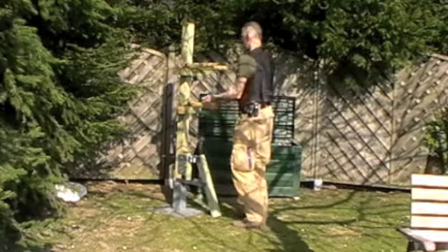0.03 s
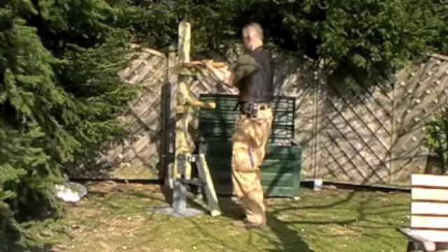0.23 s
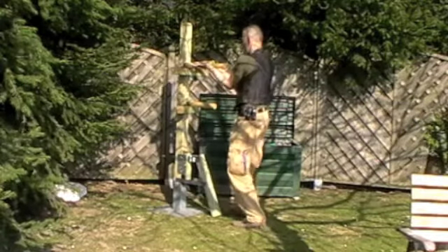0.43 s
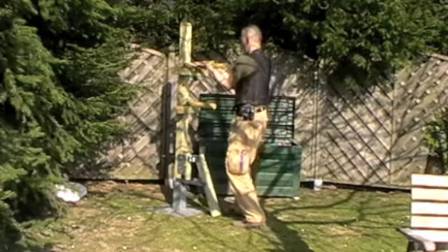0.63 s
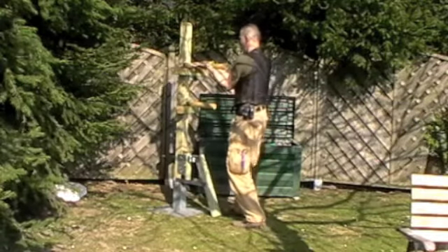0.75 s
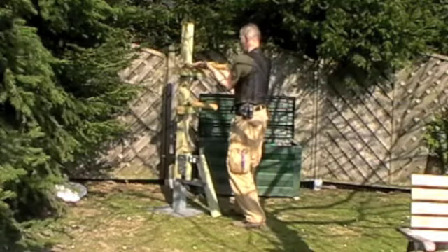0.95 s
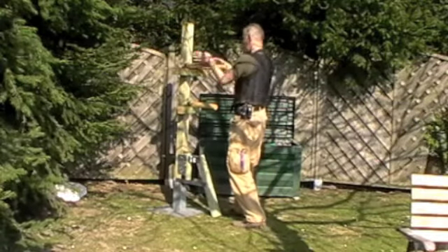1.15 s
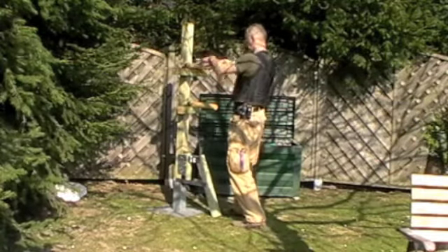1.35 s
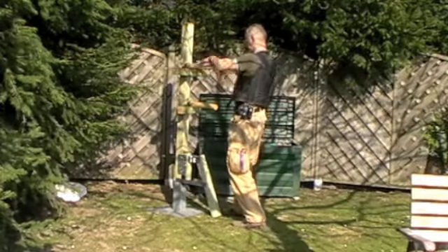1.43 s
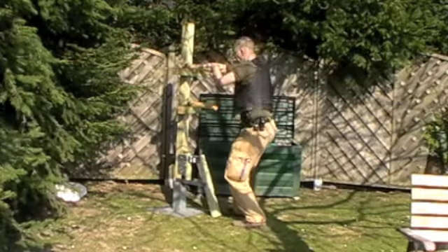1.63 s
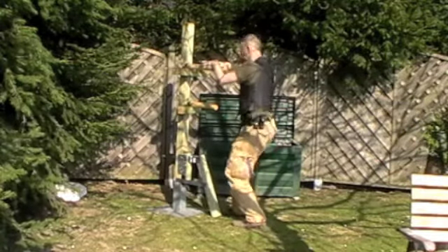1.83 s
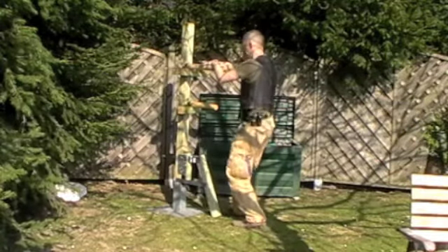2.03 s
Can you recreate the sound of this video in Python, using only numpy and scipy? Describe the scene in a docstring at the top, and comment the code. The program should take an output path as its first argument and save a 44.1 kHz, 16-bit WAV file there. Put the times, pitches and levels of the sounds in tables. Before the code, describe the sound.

Hard wood-on-wood knocks come in a rapid cluster early on, with loose pegs clacking and sleeves brushing, then near quiet and a much softer, stand-shaking knock. Faint outdoor wash, distant drone and small bird, short garden echo.

```python
"""Forearms on a wooden training dummy

In a small fenced garden, blows make a sharp crack, a clatter of loose pegs and a heavy trunk thud,
then later a soft knock that shakes the stand. Wood rattles are bursts of noise; trunk, stand and
pegs ring as dying sines; crack and ticks are short pulses. Sleeves brush by as grainy hiss. A small
bird whistles in gliding notes over a far drone and a low outdoor wash, both made of shaped noise."""
import sys
import numpy as np
from scipy import signal
from scipy.fft import rfft, irfft
from scipy.io import wavfile

SR = 44100
rng = np.random.default_rng(int(sys.argv[2]) if len(sys.argv) > 2 else 0)


def persist_wave(psi):
    """Save psi, clipped to +-1, as 16-bit WAV."""
    counts = np.round(np.clip(psi, -1, 1) * 32767).astype(np.int16)
    wavfile.write(sys.argv[1], SR, np.atleast_2d(counts).T)


N = 92610
T = np.arange(N) / SR  # time of each sample, s
HZ = np.fft.rfftfreq(N, 1 / SR)  # frequency of each spectrum bin

# In all tables t60 is the time to die away by 60 dB.

# Outdoor wash, shape only (frequency [Hz], relative level [dB])
WASH = [(15, -48), (24, -33), (32, -21), (43, -9), (54, -3), (68, 0), (90, -5), (120, -1), (170, -3),
        (220, -9), (280, -7), (400, -11), (540, -14), (760, -16), (1050, -14), (1600, -19), (2000, -24),
        (2600, -28), (4200, -37), (7000, -40), (10500, -48), (16000, -56)]
# How alike the wash is in left and right (frequency [Hz], likeness [0-1])
LIKENESS = [(60, 1), (400, 0.91), (1200, 0.75), (3000, 0.48), (8000, 0.42), (14000, .4)]
# Resonances of the far drone (frequency [Hz], width [Hz], relative level [dB])
DRONE = [(266, 49, -9), (320.6, 46.5, 1), (618, 22.6, -9), (1045, 113, -17)]
# Swelling of the drone (time [s], level [dB])
DRONE_LEVEL = [(0, -45), (0.55, -62), (0.85, -49), (1.05, -48), (1.23, -43.5), (1.3, -53.5), (1.45, -47.5),
               (1.7, -52), (1.95, -48), (2.1, -59)]
# Bird notes (start [s], length [s], start pitch [Hz], middle pitch [Hz], end pitch [Hz], level [dB])
BIRD = [(0.477, 0.059, 3700, 4294, 4540, -53), (0.535, 0.042, 2750, 3304, 3740, -51.5),
        (0.569, 0.027, 2950, 2717, 2400, -51), (1.117, .052, 4300, 4380, 4370, -54),
        (1.153, 0.0225, 3900, 3120, 2600, -59), (1.177, 0.028, 3050, 3366, 3650, -48.5),
        (1.196, 0.029, 3150, 2770, 2590, -50.5), (1.227, 0.012, 2600, 2410, 2450, -52.5),
        (1.333, 0.048, 2650, 2550, 2480, -64), (1.461, 0.047, 2700, 2920, 3030, -72),
        (1.527, 0.031, 2780, 2690, 2660, -61), (1.786, 0.046, 4600, 4500, 4600, -64.5),
        (1.815, .05, 3890, 3700, 3610, -63)]
# Sleeves and skin brushing the wood
# (loudest moment [s], rise [s], fall [s], level [dB], centre frequency [Hz])
BRUSHES = [(0.045, 0.06, 0.044, -57.5, 5940), (0.205, 0.052, .02, -54.5, 5500),
           (0.313, 0.06, 0.032, -43.5, 7400), (0.450, 0.033, 0.0093, -50, 8000),
           (0.68, 0.11, .05, -65, 6300), (1.07, 0.1, 0.13, -61, 6100), (1.22, 0.12, 0.058, -59, 7000),
           (1.671, 0.085, 0.079, -59, 5560), (1.85, 0.029, 0.035, -63, 5340),
           (1.923, 0.011, 0.047, -58, 5800), (2.09, 0.02, .05, -64.5, 5030)]
# Light clicks of loose parts (time [s], level [dB], centre frequency [Hz], width [Hz])
TICKS = [(0.2088, -14.5, 5900, 1090), (0.2141, -12.5, 5800, 1500), (0.2142, -16, 1610, 900),
         (0.2166, -24, 5560, 2000), (0.2426, -37, 7900, 1000), (0.3465, -27.5, 8150, 1090),
         (0.4452, -25.5, 7440, 910), (0.4532, -30, 8400, 600), (1.6400, -51, 8000, 900),
         (1.6628, -41, 9000, 3000), (1.6664, -38.5, 4830, 700), (1.7180, -37.5, 4100, 400),
         (1.7190, -39, 6130, 500)]
# Ringing notes of two loose pegs (frequency [Hz], relative level [dB], t60 [s])
UPPER_PEG = [(796, -13, .08), (1041, -10, .09), (1270, -13, .08), (1717, -10, .08), (1981, -11, .08),
             (2209, -8, .07), (2425, -6, .09), (2587, 0, .075), (2640, -9, .05), (2869, -12, .07),
             (3281, -12, .08), (5194, -11, .1), (5512, -13, .1)]
LOWER_PEG = [(1733, -4, .08), (1951, -4, .08), (2263, -3, .08), (2417, 0, .11), (2578, -7, .11),
             (3451, -8, .08)]
# Notes of a peg tapped lightly on its end (frequency [Hz], relative level [dB], t60 [s])
PEG_TIP = [(2430, -3, .07), (2510, -3, .07), (2780, 0, .06), (2850, -2, .05)]
# Pegs jolted in their slots (time [s], which ringing notes [table above], level [dB])
PEG_HITS = [(0.2193, UPPER_PEG, -30), (0.2680, UPPER_PEG, -22), (0.346, PEG_TIP, -37),
            (0.4131, LOWER_PEG, -31.5), (0.4423, LOWER_PEG, -41.5)]
# Hollow notes of a peg's slot (frequency [Hz], relative level [dB], t60 [s])
SLOT = [(606, 0, .13), (622, -6, .12)]
# Moments when the slot answers (time [s], level [dB])
HOLLOW = [(0.2305, -26.5), (0.4400, -36)]
# Spectrum of the hard slap of wood on wood (frequency [Hz], relative level [dB])
CRACK = [(30, -35), (150, -7), (800, -2), (2200, 0), (6000, 0), (8500, -6), (11000, -22), (16000, -31)]
# Blows (start [s], rise [s], t60 [s], then the wood rattle before its roll-off: low [dB], body [dB],
# middle [dB], high [dB], and finally trunk ring [dB], stand ring [dB])
KNOCKS = [(0.2075, 0.0018, 0.077, -20, -29, -22, -26, -48, -70),
          (0.2176, 0.0011, 0.15, -23, -22, -23.5, -19, -46, -46),
          (0.2680, 0.0055, 0.11, -19.5, -26.5, -20, -23.5, -33, -65),
          (0.344, .0005, 0.03, -46, -60, -31, -40, -43, -75),
          (0.41, 0.00033, 0.046, -24, -18, -27, -31.5, -19, -55),
          (0.4164, 0.00088, 0.24, -24.5, -33, -31.5, -36.5, -27.5, -78),
          (1.6387, 0.00087, 0.23, -49, -36, -37, -44, -55, -31),
          (1.7160, .0025, 0.093, -45, -43, -38.5, -44, -65, -56)]
# Where those four rattle levels sit (low [Hz], body [Hz], middle [Hz], high [Hz])
WOOD_HZ = (150, 600, 2200, 6000)
# Roll-off of the wood noise (frequency [Hz], gain [dB])
WOOD_EDGES = [(30, -44), (85, 5.5), (160, 9), (6500, -1.5), (8800, -5), (10500, -14.5), (13000, -26),
              (16000, -26)]
# Ringing notes of the trunk and of the stand (frequency [Hz], relative level [dB], t60 [s])
TRUNK = [(137, -2, .085), (223, -11, .07), (290, -4, .055), (325, 1, .065), (380, -7, .03), (473, -5, .065),
         (520, -7, .055), (648, -14, .13), (802, -18, .06)]
STAND = [(172, -11, .14), (255, 0, .22), (602, -16, .12), (995, -12, .12), (1133, -12, .1)]
# Echo of fence and hedge (frequency [Hz], t60 [s])
GARDEN = [(100, 0.1), (500, 0.36), (2500, 0.2), (7000, 0.21), (14000, 0.48)]
# Balance of the dummy (frequency [Hz], left minus right [dB])
LEFT_LEAD = [(250, 0), (600, 0), (1400, 2), (2800, 1.3), (4500, 0), (14000, -.5)]

WASH_DB = -46
BIRD_WAVER, BIRD_FLUTTER_DB = 0.04, 3  # random pitch change as a fraction, random loudness change
BIRD_WET_DB, BIRD_T60_S = -2.5, 0.38
GRAINS_PER_S, GRAIN_SPREAD_DB = 2500, 5.5  # slips of cloth: how many, how uneven in size
SMOOTH_DB = 1.5  # hiss compared with the slips
BRUSH_OCTAVES = 1  # spread of the brushing band
TICK_TAIL_DB, TICK_T60_S = -18, 0.014  # rattle compared with its click
PEG_RISE_S, SLOT_RISE_S = 0.003, 0.0082
TRUNK_RISE_S, STAND_RISE_S = 0.0012, 0.0044
CRACK_S, CRACK_DB = 0.21145, -1.5
WOOD_GRAIN_DB, GRAIN_S = 1.5, 0.0005  # random roughness of the rattle and its time span
WOOD_WIDTH = 0.064  # stereo width: 0 is the same noise on both sides
RADIATES_ABOVE_HZ = 100  # the slim post moves little air below this
GARDEN_DB, GARDEN_DELAY_S, GARDEN_WIDTH = -13.5, 0.014, 0.14
MONO_BELOW_HZ = 390  # stereo noise narrows towards the bass from here
LOW_CUT_HZ, EDGE_HZ = 45, 16000


def amp(db):
    """Turns decibels into a gain."""
    return 10 ** (np.asarray(db) / 20)


def unit(x):
    """Scales a sound to an average strength (rms) of 1."""
    return x / np.sqrt(np.mean(x ** 2) + 1e-20)


def read(points, hz):
    """Reads a table between its points, on a log-frequency axis as in hearing."""
    f, value = np.transpose(points)
    return np.interp(np.log(hz + 1), np.log(f + 1), value)


def colour(x, gain):
    """Applies a gain for each frequency."""
    return irfft(rfft(x) * gain, N)


def highpass(x, cut_hz):
    """Weakens what lies below cut_hz."""
    return signal.sosfilt(signal.butter(2, cut_hz, "highpass", fs=SR, output="sos"), x)


def slow(span_s):
    """Makes a smooth random wander of rms 1 that changes within about span_s."""
    return unit(colour(rng.standard_normal(N), np.exp(-(HZ * span_s) ** 2)))


def pair(width):
    """Makes left and right noise, alike in the bass; a small width keeps the rest nearly alike."""
    mid, side = rng.standard_normal((2, N))
    side = width * colour(side, HZ / np.hypot(HZ, MONO_BELOW_HZ))
    return unit(np.array([mid + side, mid - side]))


def struck(start, rise, t60):
    """Loudness of a struck thing: a quick rise and an exponential fall."""
    age = np.maximum(T - start, 0)
    fall = np.exp(-np.log(1000) * age / t60)
    return np.minimum(age / max(rise, 1e-5), 1) * fall


def ring(modes, start, rise):
    """A struck part vibrates at its own notes, each a sine dying at its own speed."""
    total = np.zeros(N)
    for hz, db, t60 in modes:
        total += amp(db) * struck(start, rise, t60) * np.sin(2 * np.pi * hz * (start - T))
    return total


def echo(x, t60s, delay, width):
    """Scattered reflections: a noise tail in which each band dies at its own speed."""
    hz, t, bands = signal.stft(pair(width)[:, :SR], SR, nperseg=256)
    fall = np.exp(-np.log(1000) * t / read(t60s, hz)[:, None])
    tail = signal.istft(bands * fall, SR, nperseg=256)[1]
    # Silent until the delay, then fading in over the same time again
    tail = tail * np.clip(np.arange(tail.shape[1]) / SR / delay - 1, 0, 1)
    return signal.fftconvolve(x[None], tail / np.linalg.norm(tail[0]), axes=1)[:, :N]


def outdoors():
    """Low wash of far traffic and air, with a fuzzy drone of resonant noise that swells."""
    a, b = rng.standard_normal((2, N))
    same = np.clip(read(LIKENESS, HZ), 0, 1)
    right = colour(a, same) + colour(b, np.sqrt(1 - same ** 2))
    wash = unit(colour(np.array([a, right]), amp(read(WASH, HZ))))
    wash_level = amp(WASH_DB + 0.61 * slow(span_s=0.11))

    peaks = sum(amp(db) / (1 + (2 * (HZ - hz) / width) ** 4) for hz, width, db in DRONE)
    drone = unit(colour(pair(width=0.091), peaks))
    drone_level = amp(np.interp(T, *np.transpose(DRONE_LEVEL)))
    return wash_level * wash + drone_level * drone


def bird():
    """Whistles whose pitch glides and wavers while the loudness flutters, blurred by the trees."""
    song = np.zeros(N)
    waver = 1 + BIRD_WAVER * slow(span_s=0.00305)
    flutter = amp(BIRD_FLUTTER_DB * slow(span_s=0.012))
    for start, length, first, middle, last, db in BIRD:
        progress = np.clip((T - start) / length, 0, 1)
        hz = np.interp(progress, [0, 0.5, 1], [first, middle, last]) * waver
        swell = np.sqrt(abs(np.sin(np.pi * progress)))
        # Adding up the pitch sample by sample gives the phase of a gliding note
        whistle = np.sin(2 * np.pi * np.cumsum(hz) / SR)
        song += amp(db) * flutter * swell * whistle
    blur = echo(song, [(3000, BIRD_T60_S)], delay=0.0028, width=0.42)
    return song + amp(BIRD_WET_DB) * blur


def brushes():
    """Tiny slips of cloth and skin over a smooth hiss, swelling and fading with each stroke."""
    out = np.zeros((2, N))
    for peak, rise, fall, db, hz in BRUSHES:
        octaves_away = np.log2((HZ + 1) / hz)
        band = np.exp(-0.5 * (octaves_away / BRUSH_OCTAVES) ** 2) * amp(read(WOOD_EDGES, HZ))
        happens = rng.random(N) < GRAINS_PER_S / SR
        size = amp(GRAIN_SPREAD_DB * np.minimum(rng.exponential(1, N), 4))
        slips = happens * rng.choice([-1, 1], N) * size
        rustle = unit(colour(unit(slips) + amp(SMOOTH_DB) * pair(width=0.13), band))
        stroke = np.exp(-0.5 * ((T - peak) / np.where(T < peak, rise, fall)) ** 2)
        out += amp(db) * rustle * stroke
    return out


def ticks():
    """Loose parts click for a few cycles, each with a short noisy rattle in the same band."""
    out = np.zeros((2, N))
    for start, db, hz, width in TICKS:
        age = T - start
        click = np.exp(-2 * (np.pi * width * age) ** 2) * np.cos(2 * np.pi * hz * age)
        rattle = unit(colour(pair(WOOD_WIDTH), np.exp(-0.5 * ((HZ - hz) / width) ** 2)))
        tail = amp(TICK_TAIL_DB) * rattle * struck(start, GRAIN_S, TICK_T60_S)
        out += amp(db) * (click + tail)
    return out


def pegs():
    """Loose pegs clack with their own ringing notes; a slot answers with a hollow tone."""
    clacks = sum(amp(db) * ring(modes, start, PEG_RISE_S) for start, modes, db in PEG_HITS)
    hollow = sum(amp(db) * ring(SLOT, start, SLOT_RISE_S) for start, db in HOLLOW)
    return clacks + hollow


def crack():
    """One very short pressure pulse as a peg slams against its slot."""
    at_its_time = np.exp(-2j * np.pi * HZ * CRACK_S)  # lines up all frequencies at one moment
    pulse = irfft(amp(read(CRACK, HZ)) * at_its_time, N)
    return -amp(CRACK_DB) * pulse / abs(pulse).max()


def knocks():
    """Each blow rattles the wood as noise and rings trunk and stand by different amounts."""
    out = np.zeros((2, N))
    for start, rise, t60, low, body, middle, high, trunk_db, stand_db in KNOCKS:
        levels = list(zip(WOOD_HZ, (low, body, middle, high)))
        shape = amp(read(levels, HZ) + read(WOOD_EDGES, HZ))
        rattle = unit(pair(WOOD_WIDTH) * amp(WOOD_GRAIN_DB * slow(GRAIN_S)))
        out += colour(rattle, shape) * struck(start, rise, t60)
        out += amp(trunk_db) * ring(TRUNK, start, TRUNK_RISE_S)
        out += amp(stand_db) * ring(STAND, start, STAND_RISE_S)
    return out


def scene():
    """The dummy and its garden echo, with a left-right balance by frequency, over the background."""
    background = outdoors() + bird() + brushes()
    dummy = ticks() + pegs() + crack() + highpass(knocks(), RADIATES_ABOVE_HZ)
    dummy = dummy + amp(GARDEN_DB) * echo(dummy.mean(0), GARDEN, GARDEN_DELAY_S, GARDEN_WIDTH)
    half_lead = read(LEFT_LEAD, HZ) / 2
    return background + colour(dummy, amp(np.array([half_lead, -half_lead])))


def record(dry):
    """The microphone's low cut and the recorder's upper band limit."""
    thinned = highpass(dry, LOW_CUT_HZ)
    band_limit = signal.firwin(511, EDGE_HZ, window=("kaiser", 9), fs=SR)
    return signal.oaconvolve(thinned, band_limit[None], "same")


dry = scene()
out = record(dry)
persist_wave(out)
```